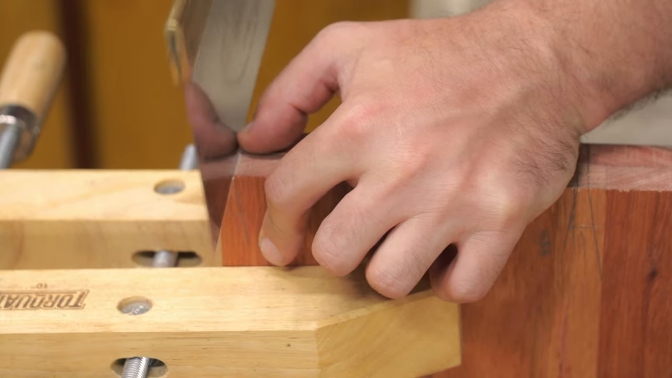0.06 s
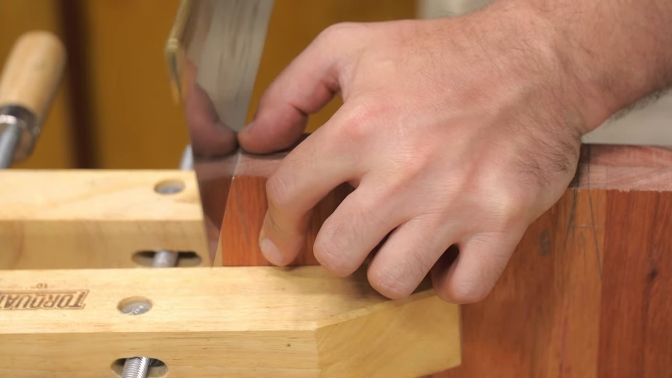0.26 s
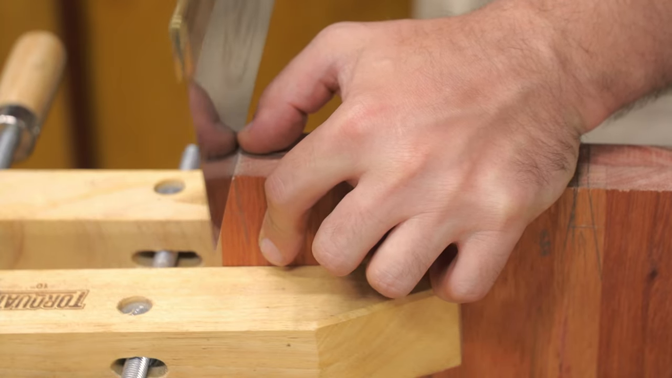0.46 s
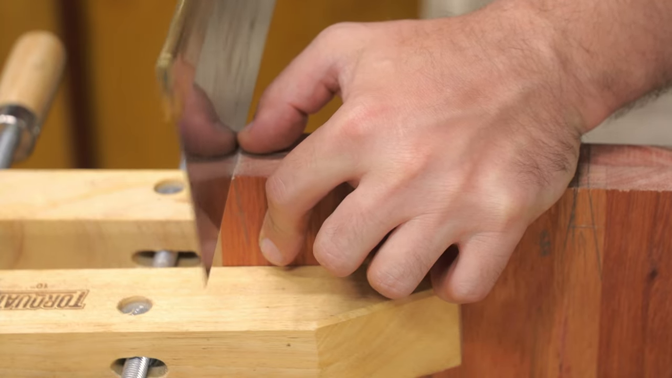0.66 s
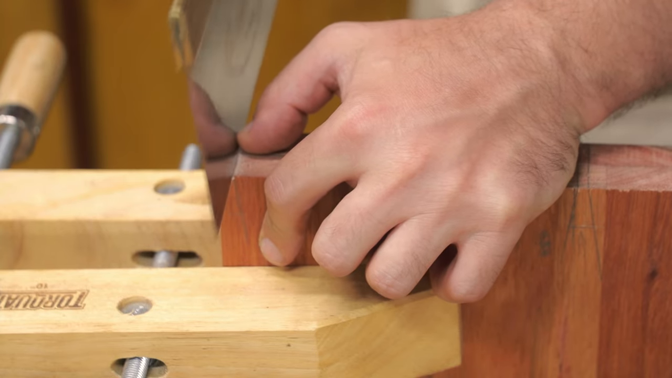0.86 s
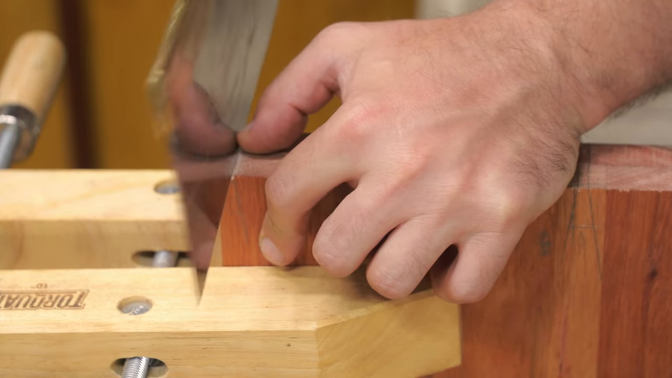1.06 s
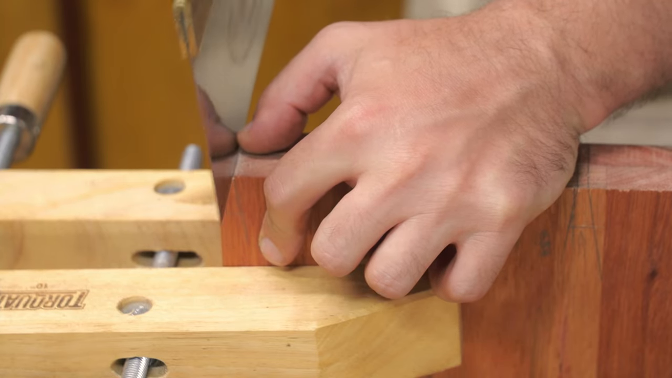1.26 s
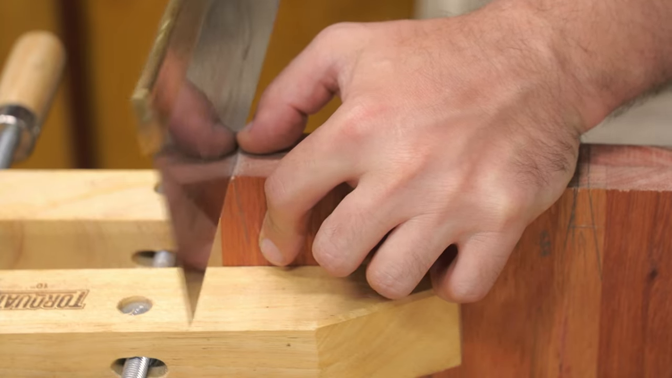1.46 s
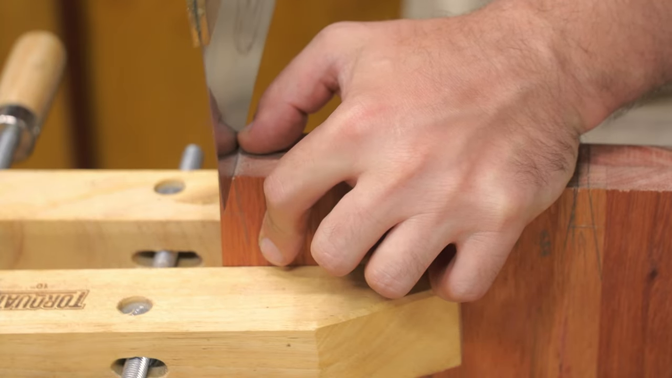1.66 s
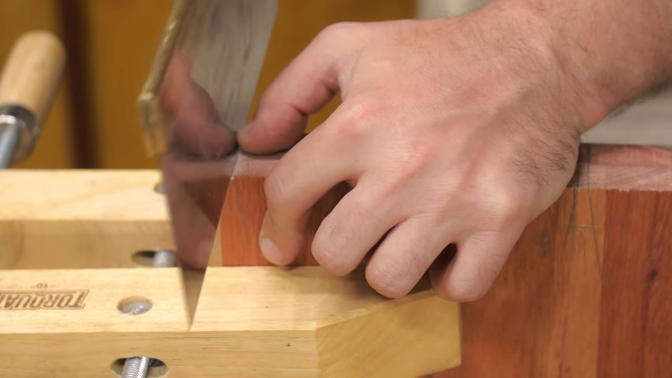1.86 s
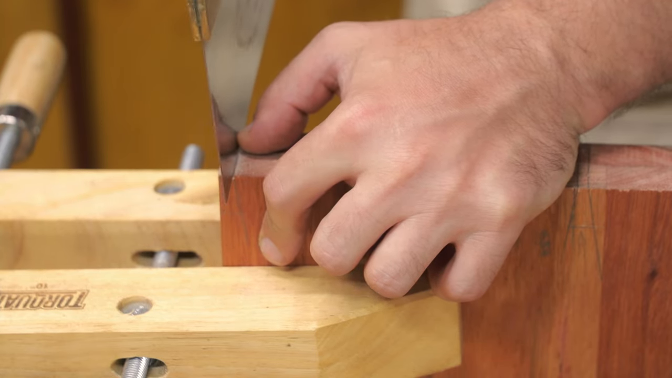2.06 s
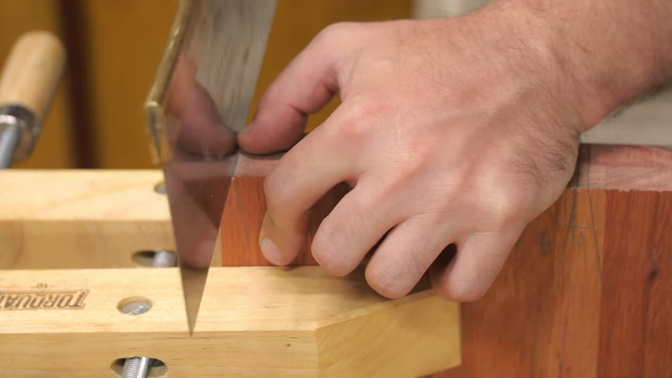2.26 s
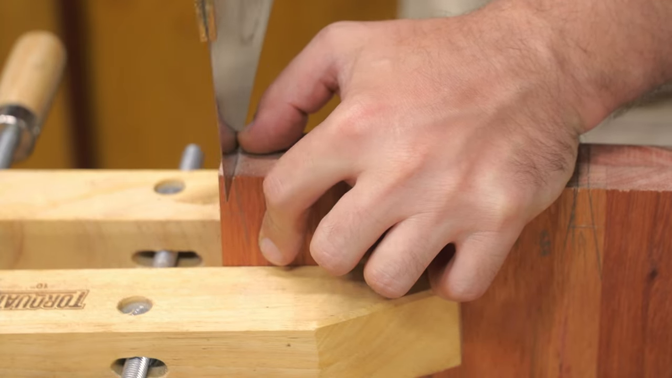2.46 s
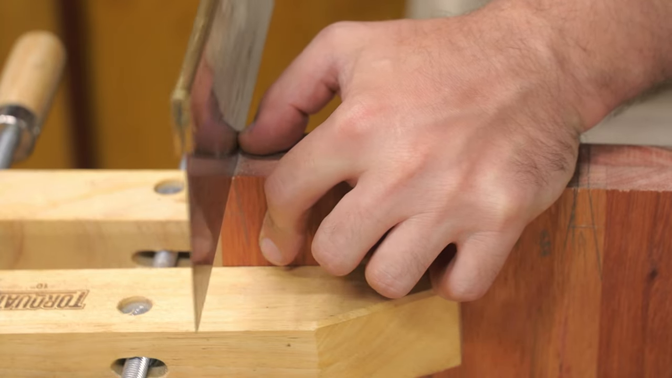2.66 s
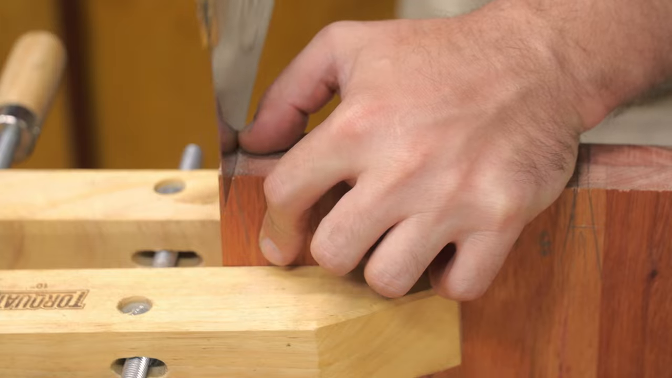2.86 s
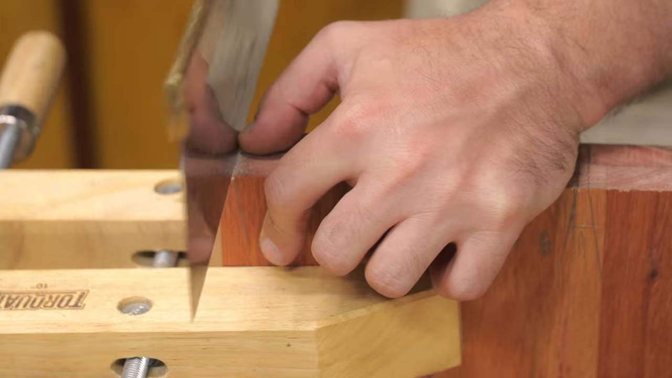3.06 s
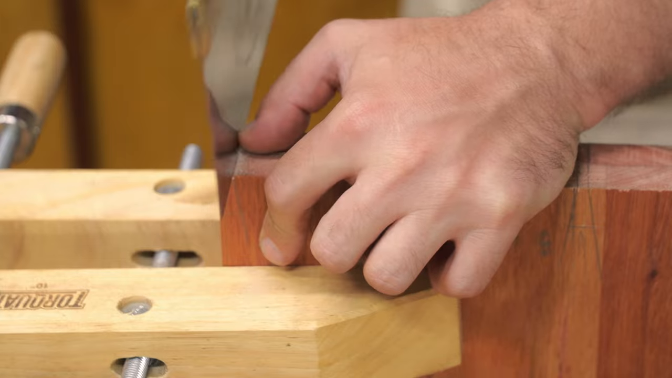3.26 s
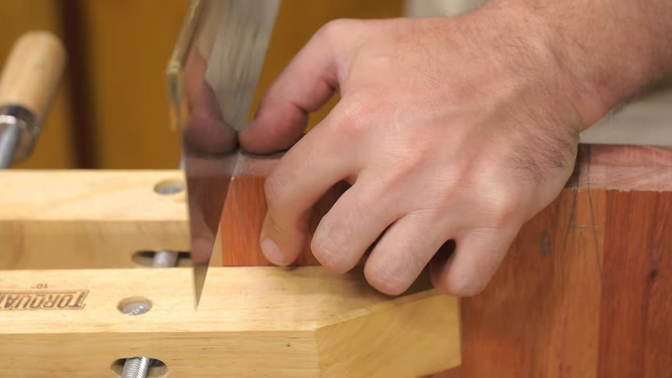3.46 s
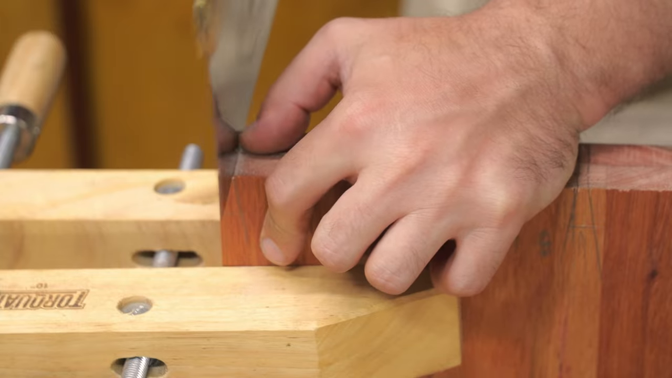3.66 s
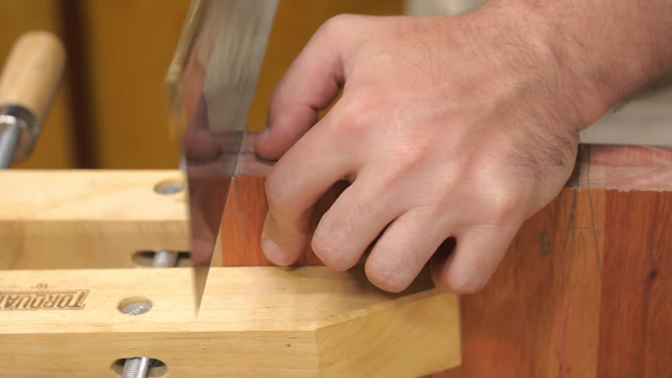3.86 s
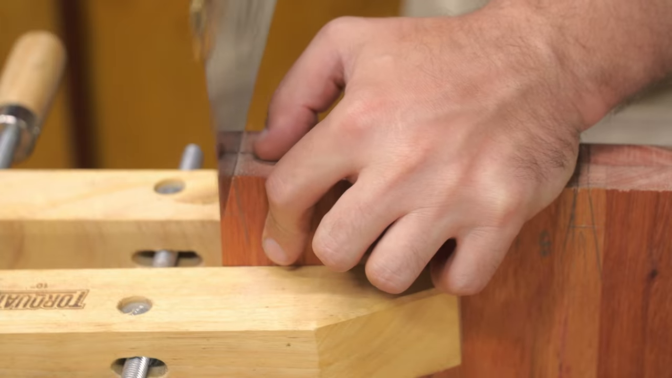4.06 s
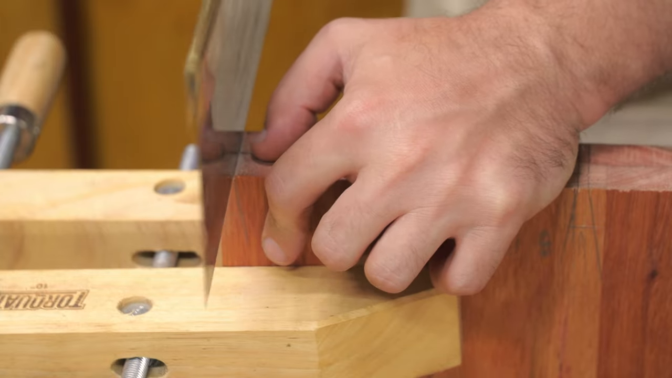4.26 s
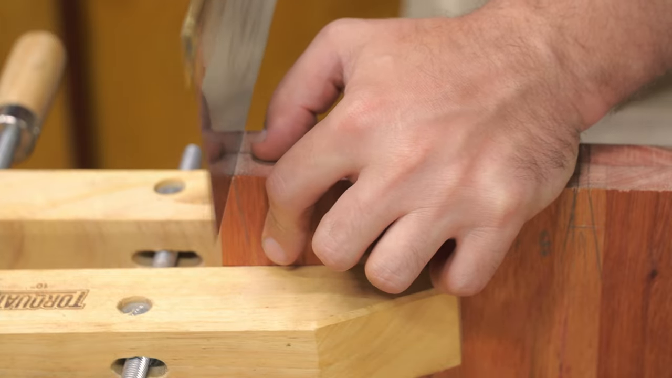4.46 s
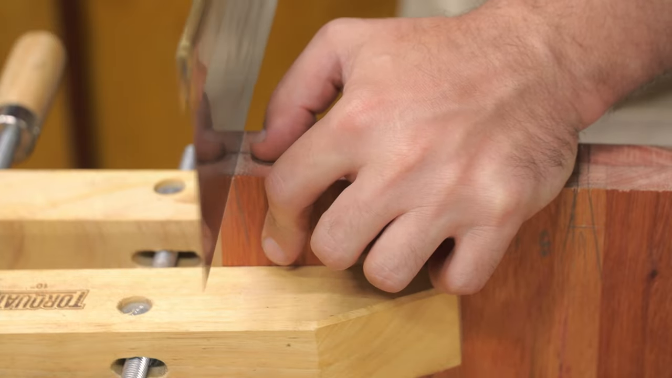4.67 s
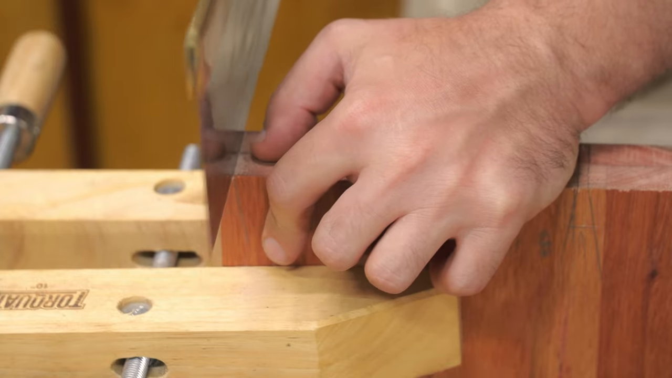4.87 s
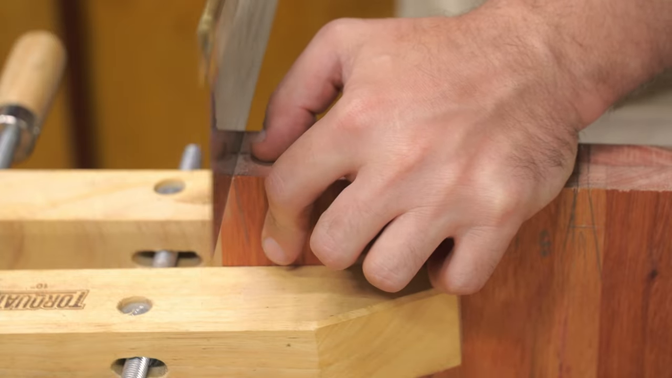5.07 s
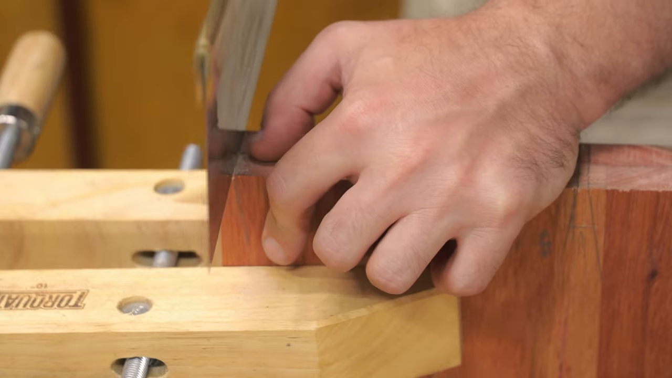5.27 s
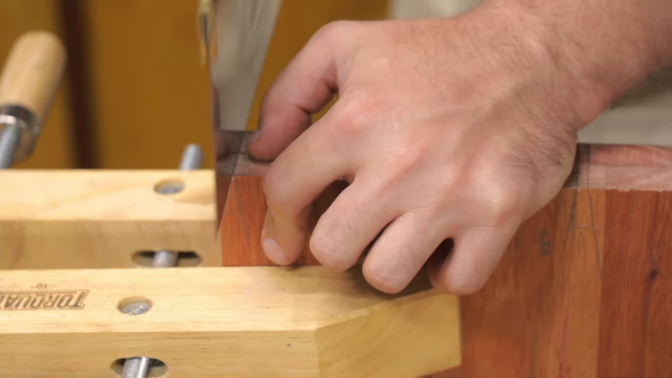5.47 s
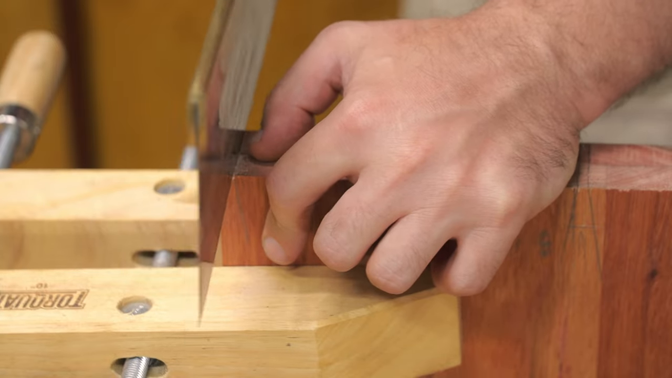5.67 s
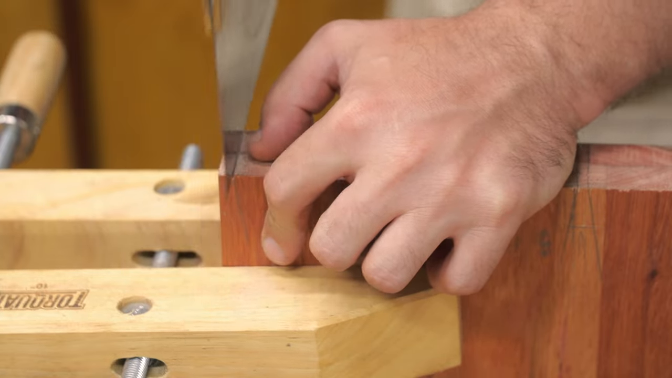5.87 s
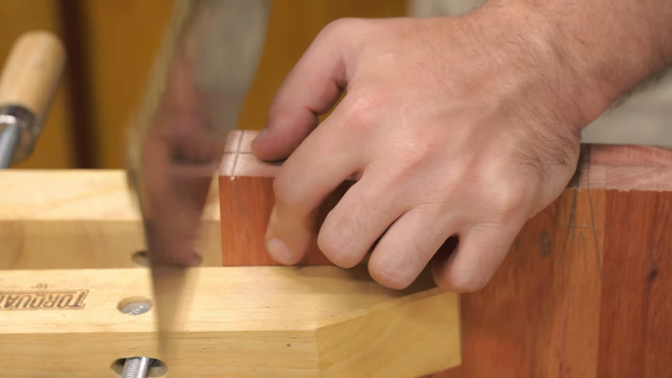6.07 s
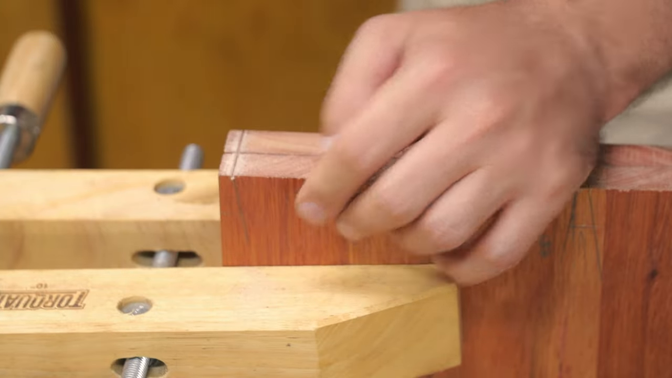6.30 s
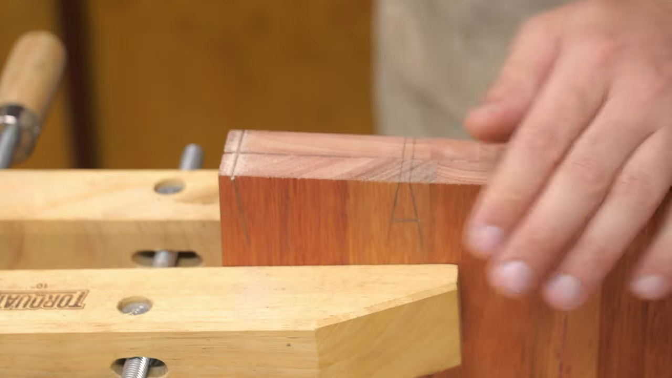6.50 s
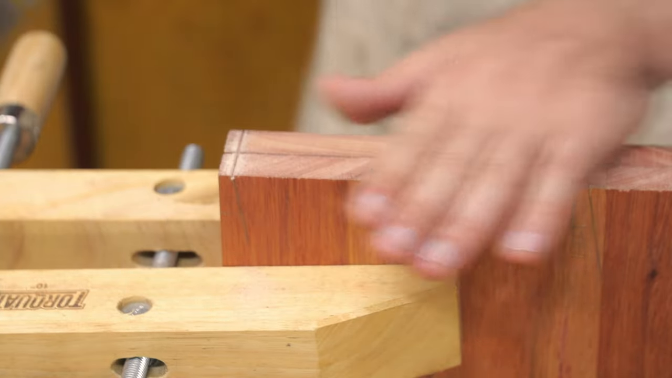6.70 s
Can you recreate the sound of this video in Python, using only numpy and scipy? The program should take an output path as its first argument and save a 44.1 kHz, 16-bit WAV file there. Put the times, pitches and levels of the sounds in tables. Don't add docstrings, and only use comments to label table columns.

```python
import sys
import numpy as np
from scipy import signal
from scipy.fft import rfft, irfft, next_fast_len
from scipy.io import wavfile
from scipy.ndimage import uniform_filter1d

SR = 44100
rng = np.random.default_rng(int(sys.argv[2]) if len(sys.argv) > 2 else 0)


def master_out(mix):
    frames = np.transpose(np.atleast_2d(mix))
    ceiling = np.clip(frames, -1, 1)
    pcm = np.round(ceiling * 32767).astype(np.int16)
    wavfile.write(sys.argv[1], SR, pcm)


def volts_from_decibels(level):
    exponent = np.asarray(level, float) / 20
    return 10 ** exponent


N = 297096
STOP_S = 6.18

# start t/s, hiss level/dB, fastest point/share, hiss brightness/dB
STROKES = [(-0.09, -42.5, 0.5, -5), (0.103, -42, 0.55, 1.4), (0.3, -42.5, 0.53, -5),
           (0.504, -41.5, 0.53, 1), (0.713, -42, 0.57, -4), (0.92, -39.5, 0.5, -1.5),
           (1.134, -42, 0.57, -5), (1.343, -40.5, 0.49, 0.5), (1.557, -42.5, 0.45, -1.5),
           (1.77, -41, 0.5, 1), (1.969, -41.5, 0.52, -4.5), (2.18, -41, 0.49, 0.5),
           (2.4, -41.5, 0.46, -2.5), (2.609, -40, 0.48, -2.2), (2.822, -42, 0.47, -1.5),
           (3.022, -40.5, 0.54, 1), (3.243, -42, 0.41, -1.5), (3.441, -39, 0.54, -2),
           (3.651, -41, 0.45, -2), (3.854, -40, 0.5, 0), (4.055, -41, 0.5, -1.5), (4.265, -39, 0.46, 0.8),
           (4.474, -38, 0.48, -7.5), (4.681, -38.5, 0.46, 0.7), (4.89, -40, 0.55, -3),
           (5.098, -39.0, 0.5, 1.3), (5.311, -42.5, 0.48, -2.5), (5.514, -38.5, 0.53, -0.8),
           (5.737, -39.5, 0.54, -1.5), (5.945, -37, 0.42, 0.5)]
# board level/dB, heaviest point/share, board tilt/(dB/octave), blade level/dB
LOAD = [(-25, 0.3, -2.4, -36.5), (-32, 0.51, 1.5, -35.5), (-26.5, 0.46, -2.2, -37.5),
        (-28.5, 0.29, 0.6, -34.5), (-28, 0.43, -0.4, -34.5), (-31, 0.23, 4.5, -36.5),
        (-26.5, 0.47, -1, -35.5), (-28, 0.31, 1, -34.5), (-30, 0.61, 0, -37.5), (-32.5, 0.34, 1.8, -34.5),
        (-26.5, 0.46, -1.8, -37), (-33.5, 0.46, 2.2, -35.5), (-26.5, 0.4, 2.2, -35), (-30.5, 0.31, 2, -35),
        (-32, 0.48, 1.4, -37.5), (-27.5, 0.38, -0.2, -32.5), (-36.5, 0.52, 2, -37.5),
        (-28.9, 0.33, 1.2, -33.5), (-33, 0.46, 2.8, -36.5), (-29, 0.17, 2.9, -34), (-28.0, 0.29, 1.6, -33),
        (-29.5, 0.33, 1.2, -31.5), (-19, 0.28, 1, -35.5), (-25, 0.37, -3.5, -31), (-29.5, 0.42, 1.1, -36.5),
        (-27, 0.36, 2.2, -29.5), (-28, 0.55, -1, -31), (-32.5, 0.22, 3.5, -31), (-26.3, 0.54, -0.8, -31.8),
        (-27.5, 0.28, 0.5, -30.5)]
# low sway level/dB, its top/share, upper sway level/dB, its top/share
ROCKING = [(-34, 0.15, -44, 0.1), (-52.5, 1, -53.5, 0.54), (-51, 0.5, -60, 0.73), (-54, 0.4, -52.8, 0.46),
           (-44, 0.6, -56, 0.7), (-51, 1, -57, 0.1), (-50, 0.51, -51, 0.57), (-43.5, 0.74, -52, 0.4),
           (-64, 0.34, -45.5, 0.97), (-47.5, 0.9, -46, 0.31), (-47.7, 0.66, -52.5, 1), (-45.5, 0.9, -53, 0),
           (-51, 0.38, -43.5, 0.67), (-55, 0.25, -49.5, 0), (-63, 0.22, -52.5, 0.65),
           (-51, 0.85, -51.5, 0.22), (-51.9, 0, -57, 0.7), (-47, 0.9, -53.8, 0.4), (-58, 0.23, -48.5, 0.8),
           (-58, 0.75, -45, 1), (-58, 0, -49, 0), (-51.5, 0.6, -52.1, 0.62), (-51.5, 0.46, -45.5, 0.7),
           (-39.5, 0.7, -54.5, 0.1), (-52, 0.5, -52, 0.75), (-48, 0.68, -46, 0.5), (-56.5, 0.3, -52, 0.93),
           (-57, 0.6, -49.3, 0.4), (-54.5, 0.41, -52.5, 0.75), (-46, 0.8, -51, 0.61)]
# power of speed/1, decay after stop/(dB/s), rest before pull/dB, rest before push/dB
HISS_SWELL = (1.6, 299.5, -20, -24)
BOARD_SWELL = (2.5, 250.5, -15.5, -13)
BLADE_SWELL = (1.98, 250, -13.5, -19.5)
BENCH_SWELL = (1.5, 126, -8.5, -10)
BLADE_LAG = (-.07, 0.014)
# t/s, peak level/dB
CATCHES = [(0.581, -15.5), (0.967, -24), (1.217, -23), (1.394, -34.5), (1.839, -21), (2.051, -15),
           (2.284, -26), (2.434, -20), (3.088, -18), (3.115, -22.5), (3.487, -43), (3.946, -15),
           (4.094, -21), (4.508, -31), (4.546, -15), (4.560, -16), (4.574, -12.5), (4.931, -23.5),
           (4.973, -17.5), (4.995, -22), (5.166, -14.5), (5.192, -15.5), (5.339, -30), (5.379, -28.5),
           (5.408, -22.5), (5.624, -32.5), (5.668, -22.5), (6.021, -13), (6.058, -17)]
# f/Hz, width/Hz, level/dB
BOARD = [(238.4, 103.5, -9.5), (270, 26.4, 0.5), (323, 12.5, -5), (377.5, 25.6, -1), (398, 21.5, 0),
         (428.7, 13.6, 3), (503.6, 7.9, -10), (554.4, 23.7, -7.5), (623.6, 23.3, -11), (670, 45, -17),
         (762, 9.4, -13), (808, 28, -19), (936, 24, -19.5), (964, 19, -16), (1030, 110, -25.5)]
# f/Hz, width/Hz, level/dB
BLADE = [(1152, 110, -22), (1225, 28, -7), (1322, 40, -5.5), (1427, 55, 0.5), (1524.6, 55, 1),
         (1626, 21, -6), (1690, 45, -7), (1856, 96, -13.5), (1990, 17, -14), (2105, 81, -15.5),
         (2367, 280, -24)]
# f/Hz, width/Hz, level/dB
TOOTH_LINE = [(3066, 89, 1), (3520, 140, 1.5), (4390, 50, -6), (5620, 70, -1), (6265, 84, -2),
              (6240, 160, 5.5)]
# f/Hz, width/Hz, level/dB
SQUEAK = [(6440, 410, 0)]
# f/Hz, width/Hz, level/dB
BENCH = [
    [(86.6, 6.9, -2), (109.5, 8.8, -9)],
    [(142.2, 5.9, 1.5)],
]
# f/Hz, level/dB, t60/s
FREE_BLADE = [(564.5, 1, .44), (662, -23, .5), (1335, -18, .23), (1846, -18, .29)]
# f/Hz, level/dB
FIBRES = [(1470, -25.5), (2500, -8), (2810, -13), (3030, -6), (3510, 0), (4460, -5.5), (5210, -1.5),
          (5940, -3.5), (10400, -15.5), (11600, -17), (15100, -25), (15900, -31.5)]
# f/Hz, level/dB
SKIN = [(290, -37), (500, -9.5), (605, -1), (656, -8), (872, -5), (1220, -17), (1400, -4.5), (2690, -22),
        (5830, -20), (12800, -31), (16600, -57), (22000, -120)]
# f/Hz, level/dB
CLAMP = [(41, -36), (70, -4), (145, 3), (172, -7), (221, 4), (404, -3), (436, -21), (520, -2), (680, -39.5),
         (1140, -120)]
# f/Hz, level/dB
AIR = [(18, -37), (30, 5), (398, -2.5), (965, -11.5), (1150, -23), (1520, -14), (2730, -21), (3990, -17),
       (12800, -25.5), (16600, -55), (22000, -120)]
# t/s, level/dB
TOUCHES = [
    (6.25, -68),
    (6.3, -72),
    (6.41, -72.5),
    (6.6, -74.5),
    (6.654, -70),
    (6.73, -75),
]
# t/s, step over treble rms/dB
COARSE = [(.144, 13.5), (.657, 4), (1.745, 11), (1.766, 11), (1.979, 12), (2.0, 8), (2.256, 10.5),
          (2.278, 5), (2.662, 6), (2.939, 1.5), (3.024, 19), (3.046, 12.5), (3.792, 11.5), (3.856, 6),
          (4.347, 9), (4.432, 2), (4.539, 12), (5.072, 15.5), (5.179, 5.5), (5.264, 10.5), (5.414, 0),
          (5.734, 13), (5.968, 22), (6.011, 11.5)]


def rms_one(x):
    return x / np.sqrt(np.mean(x ** 2) + 1e-20)


def drift(rate_hz):
    r = np.exp(-32 * np.pi * rate_hz / SR)
    noise = rng.standard_normal(N // 16 + 3002)
    slow = signal.lfilter([1], [1, -2 * r, r * r], noise)[3000:]
    return np.interp(np.arange(N) / 16, np.arange(len(slow)), rms_one(slow))


def coloured(x, spectrum):
    size = next_fast_len(N)
    hz, db = np.transpose(spectrum)
    grid_hz = np.maximum(np.arange(size // 2 + 1) * SR / size, 1)
    gain = volts_from_decibels(np.interp(np.log(grid_hz), np.log(hz), db))
    return rms_one(irfft(rfft(x, size) * gain, size)[:N])


def body(force, modes, wander_db=0., tilt_db=0.):
    out = np.zeros(N)
    for k, (hz, width_hz, db) in enumerate(modes):
        r = np.exp(-np.pi * width_hz / SR)
        drive_db = db + tilt_db * np.log2(hz / 430)
        if wander_db:
            drive_db = drive_db + wander_db * drift(7)
        drive = force * volts_from_decibels(drive_db) + 1e-18
        zeros = [(1 - r * r) / 2, 0, (r * r - 1) / 2]
        poles = [1, -2 * r * np.cos(2 * np.pi * hz / SR), r * r]
        out += (-1) ** k * signal.lfilter(zeros, poles, drive)
    return out


def stroke_place():
    turns_s = np.append(np.array(STROKES)[:, 0], STOP_S)
    place = np.interp(np.arange(N) / SR, turns_s, np.arange(len(turns_s)))
    number = np.minimum(place.astype(int), len(STROKES) - 1)
    return number, place - number


def swell(top_db, top_share, shape):
    power, dying_db_per_s, *rest_db = shape
    number, done = stroke_place()
    top = np.clip(top_share, .15, .85)[number]
    speed = np.sin(np.pi / 2 * np.where(done < top, done / top, (1 - done) / (1 - top)))
    around_db = np.convolve(np.pad(top_db, 1, "edge"), [.5, .5], "valid")
    turn_db = around_db + np.resize(rest_db, len(around_db))
    murmur_db = np.interp(number + done, np.arange(len(turn_db)), turn_db)
    murmur_db = murmur_db - dying_db_per_s * np.maximum(np.arange(N) / SR - STOP_S, 0)
    return 20 * np.log10(volts_from_decibels(top_db[number]) * speed ** power + volts_from_decibels(murmur_db))


def still_air():
    level_db = -72
    return volts_from_decibels(level_db) * coloured(rng.standard_normal(N), AIR)


def shop_echo(x):
    t60_s, wall_cut_hz = 0.34, 4400
    size = next_fast_len(N + SR)
    one_sample = np.exp(-2j * np.pi * np.arange(size // 2 + 1) / size)
    dull = np.exp(-2 * np.pi * wall_cut_hz / SR)
    wall = (1 - dull) / (1 - dull * one_sample)
    echo = 0
    for k, lag in enumerate((rng.uniform(.015, .045, 10) * SR).astype(int)):
        loop = volts_from_decibels(-60 * lag / SR / t60_s) * wall * np.exp(lag * np.log(one_sample))
        echo = echo + (-1) ** k * loop / (1 - loop)
    return irfft(rfft(x, size) * echo, size)[:N]


def bench():
    shakes = [body(rng.standard_normal(N), modes) for modes in BENCH]
    low_db, low_top, upper_db, upper_top = np.transpose(ROCKING)
    low = volts_from_decibels(swell(low_db, low_top, BENCH_SWELL)) * rms_one(shakes[0])
    upper = volts_from_decibels(swell(upper_db, upper_top, BENCH_SWELL)) * rms_one(shakes[1])
    return low + upper


def graze(at_s, db):
    rise_s, fall_s = 0.015, 0.04
    t = np.arange(N) / SR - at_s
    return volts_from_decibels(db) * np.exp(np.where(t < 0, t / rise_s, -t / fall_s))


def clamp():
    settle_s, settle_db, settle_db_per_s, settled_db = 6.33, -62, 106, -87
    nudge_s, nudge_db = 6.625, -79
    t = np.arange(N) / SR
    settling_db = np.maximum(settle_db - settle_db_per_s * np.maximum(t - settle_s, 0), settled_db)
    level = (t > STOP_S) * volts_from_decibels(settling_db) + graze(nudge_s, nudge_db)
    return level * coloured(rng.standard_normal(N), CLAMP)


def hand():
    touches = sum(graze(s, db) for s, db in TOUCHES)
    return touches * volts_from_decibels(1.66 * drift(30)) * coloured(rng.standard_normal(N), SKIN)


def free_blade():
    lift_s, lift_db, rise_s = 6.15, -38, 0.0046
    t = np.maximum(np.arange(N) / SR - lift_s, 0)
    ring = sum(volts_from_decibels(lift_db + db - 60 * t / t60_s) * np.sin(2 * np.pi * hz * t)
               for hz, db, t60_s in FREE_BLADE)
    return (1 - np.exp(-t / rise_s)) * ring


def teeth(speed):
    teeth_per_s, jitter, spread_db = 450, 0.6, 0.5
    per_s = teeth_per_s * speed
    passed = np.cumsum(per_s * np.exp(jitter * drift(300))) / SR
    knock = np.diff(np.floor(passed), prepend=0) > 0
    depth = volts_from_decibels(spread_db * np.minimum(rng.exponential(1, N), 4))
    return rms_one(knock * depth * np.sqrt(SR / per_s))


def slips():
    slips_per_s, fade_s, share = 70, 0.0042, 0.37
    starts = (rng.random(N) < slips_per_s / SR) * rng.exponential(1, N)
    fading = signal.lfilter([1], [1, -np.exp(-1 / (fade_s * SR))], starts + 1e-18)
    return 1 - share + share * fading / fading.mean()


def patchy(hiss, bright_db):
    size = next_fast_len(N)
    lines, out = rfft(hiss, size), np.zeros(N)
    hz = np.arange(len(lines)) * SR / size
    ripple_db = np.interp(hz, np.arange(0, SR, 70), rng.normal(0, 3.2, SR // 70))
    lines = lines * volts_from_decibels(ripple_db - .6)
    place = 2 * np.log2(np.maximum(hz, 1) / 1500)
    for k in range(8):
        window = np.cos(np.pi / 2 * np.clip(place - k, -1, 1)) ** 2
        band = irfft(lines * window, size)[:N]
        out += band * volts_from_decibels(1.2 * drift(20) + bright_db * np.clip((k - 4) / 2, 0, 1))
    return out


def saw():
    _, hiss_top_db, fastest, bright_db = np.transpose(STROKES)
    board_top_db, heaviest, tilt_db, blade_top_db = np.transpose(LOAD)
    number, done = stroke_place()

    hiss_db = swell(hiss_top_db, fastest, HISS_SWELL)
    ease_s, ease_span_s, ease_db = 6.1, 0.082, -8
    easing_db = ease_db * np.clip((np.arange(N) / SR - ease_s) / ease_span_s, 0, 1)
    board_db = easing_db + swell(board_top_db, heaviest, BOARD_SWELL)
    blade_top = fastest + np.resize(BLADE_LAG, len(fastest))
    blade_db = easing_db + swell(blade_top_db, blade_top, BLADE_SWELL)

    dulling = 0.15
    bright_db = bright_db[number] + dulling * np.maximum(hiss_db + 41, -25)
    bright_db = uniform_filter1d(bright_db, size=1500)
    tilt_rise_db = 6
    tilt_db = uniform_filter1d(tilt_db[number] + tilt_rise_db * (done - .5), size=1500)

    speed = np.clip(volts_from_decibels(.6 * (hiss_db + 40)), .08, 1.5)
    knocks = teeth(speed)
    bite = volts_from_decibels(1.0 * drift(85)) * slips() ** 0.36
    force = (knocks + .5 * rng.standard_normal(N)) * bite
    catches = np.zeros(N)
    catch_s, catch_db = np.transpose(CATCHES)
    catches[(catch_s * SR).astype(int)] = volts_from_decibels(catch_db)
    blunt = signal.butter(2, 1100, fs=SR, output="sos")
    soft = signal.sosfilt(blunt, catches)

    board_unit, blade_unit = [1 / np.std(body(force, modes)) for modes in (BOARD, BLADE)]
    board_force = board_unit * (force * volts_from_decibels(board_db - 2.5) + volts_from_decibels(14) * soft)
    board = body(board_force, BOARD, wander_db=1.22, tilt_db=tilt_db)
    blade_force = blade_unit * (force * volts_from_decibels(blade_db - 3.0) + volts_from_decibels(7) * catches)
    blade = body(blade_force, BLADE, wander_db=1.5)

    bursts = rms_one(signal.lfilter([1], [1, -.98], knocks + 60 * catches))
    tearing = rng.standard_normal(N) * (1.5 + 0.97 * bursts) * bite ** 0.52 + 0.18 * knocks
    hiss = patchy(coloured(tearing, FIBRES), bright_db)
    edge = rms_one(body(tearing, TOOTH_LINE, wander_db=6.5)) * speed ** -.4
    starting = np.clip(np.gradient(hiss_db) * SR / 350, 0, 1)
    squeak = rms_one(body(tearing, SQUEAK)) * uniform_filter1d(starting, size=400)
    fibres = volts_from_decibels(-2.67) * hiss + volts_from_decibels(-11) * edge + volts_from_decibels(-11.0) * squeak
    return board + blade + volts_from_decibels(hiss_db) * fibres


def scene():
    near = saw() + bench() + free_blade() + clamp() + hand()
    return (near + volts_from_decibels(-33.5) * shop_echo(near) + still_air())[None, :]


def grainy_treble(x):
    hop, grid_s, usual_step_db = 941, 3.0245, 3.5
    quiet_s, quiet_top_hz, top_hz = 6.175, 12800, 15830
    n, line = np.arange(2 * hop) + .5, np.arange(hop) + .5
    window = np.sin(np.pi * n / (2 * hop))[:, None]
    basis = window * np.cos(np.pi / hop * np.outer(n + hop / 2, line)) * np.sqrt(2 / hop)
    hz = line * SR / (2 * hop)
    centres = np.arange(round(grid_s * SR) % hop, N + hop, hop)
    padded = np.pad(x, (hop, 2 * hop))
    lines = padded[centres[:, None] + np.arange(2 * hop)] @ basis
    power = uniform_filter1d(lines ** 2, size=24, axis=1).clip(1e-16)
    step = volts_from_decibels(usual_step_db) * np.sqrt(power)
    for s, step_db in COARSE:
        frame = np.argmin(abs(centres - s * SR))
        step[frame] = volts_from_decibels(step_db) * np.std(lines[frame, (hz > 3000) & (hz < 8000)])
    limit_hz = np.where(centres > quiet_s * SR, quiet_top_hz, top_hz)[:, None]
    kept = np.where(hz > 2450, np.round(lines / step) * step, lines) * (hz < limit_hz)
    for centre, change in zip(centres, (kept - lines) @ basis.T):
        padded[centre:centre + 2 * hop] += change
    return padded[hop:hop + N]


def top_cut(x):
    return signal.sosfilt(signal.butter(12, 16010, fs=SR, output="sos"), x)


def record(dry):
    low_cut = signal.butter(1, 45, "high", fs=SR, output="sos")
    mic = signal.sosfilt(low_cut, dry[0])
    mix = grainy_treble(mic)[None, :]
    return top_cut(mix)


dry = scene()
out = record(dry)
master_out(out)
```